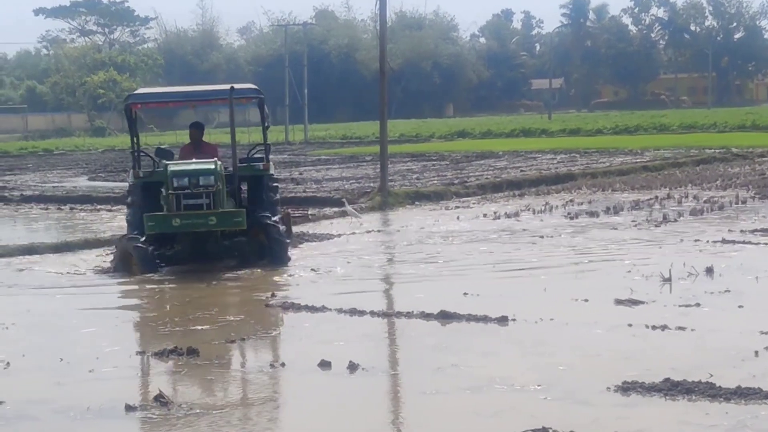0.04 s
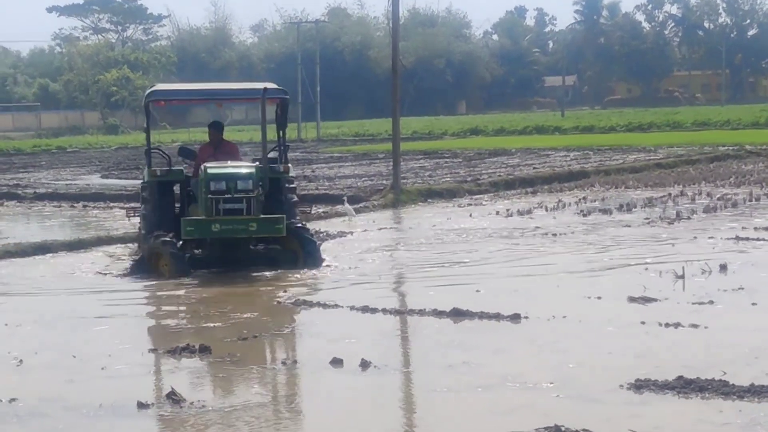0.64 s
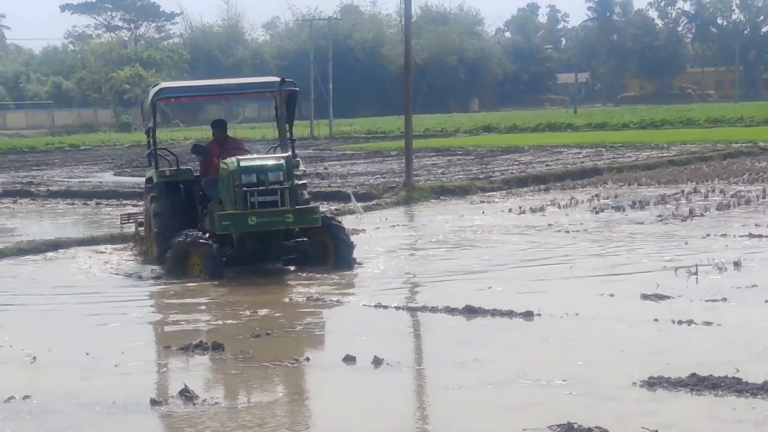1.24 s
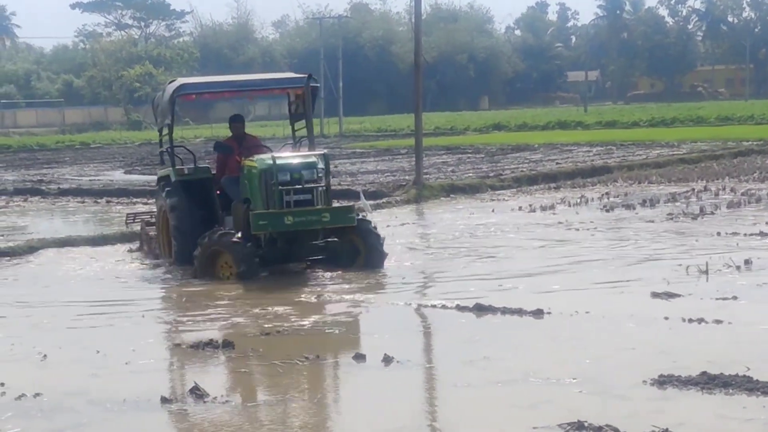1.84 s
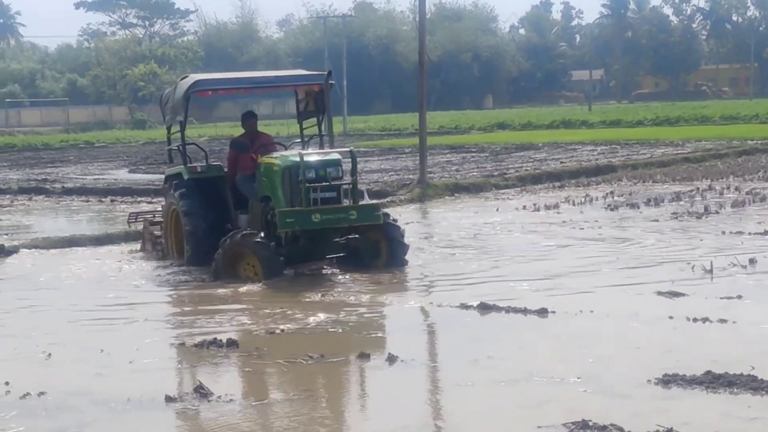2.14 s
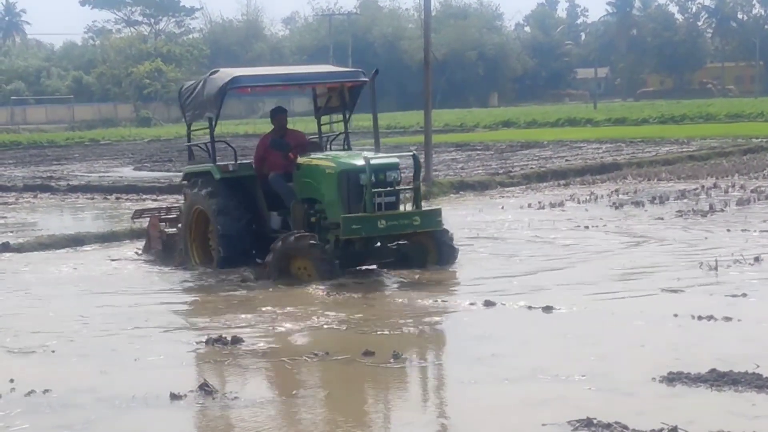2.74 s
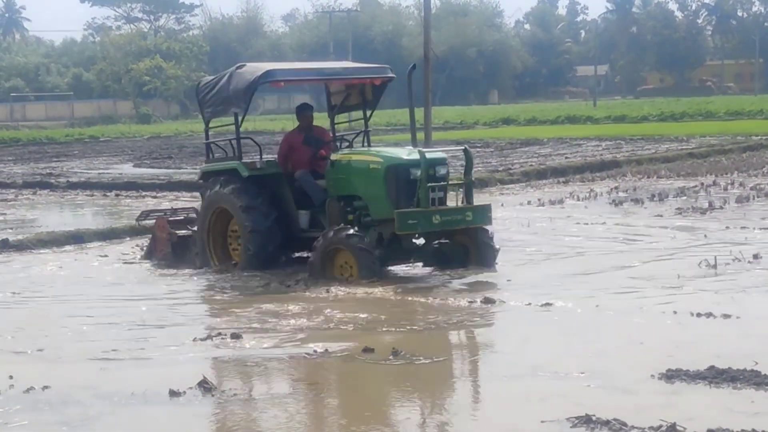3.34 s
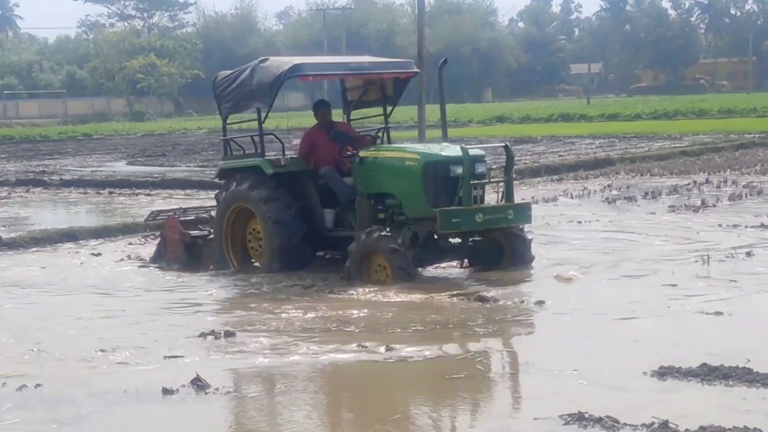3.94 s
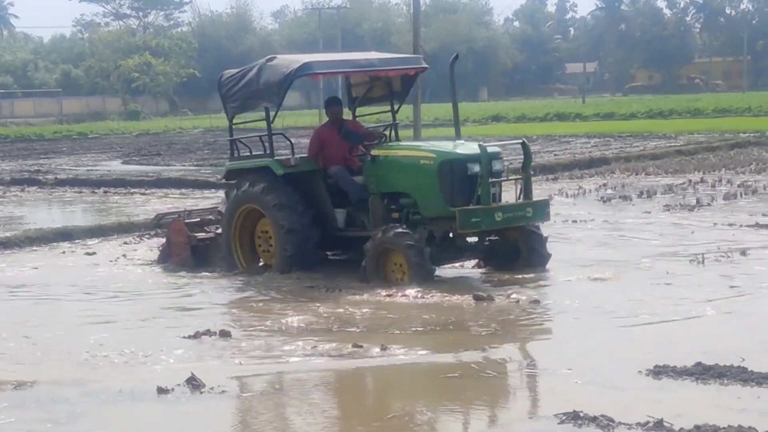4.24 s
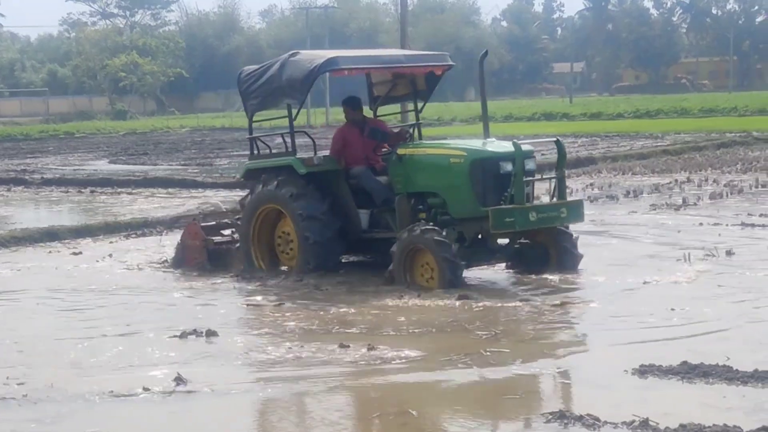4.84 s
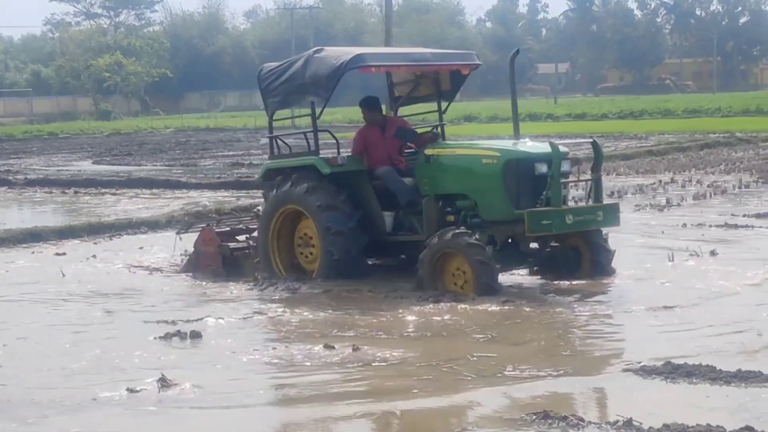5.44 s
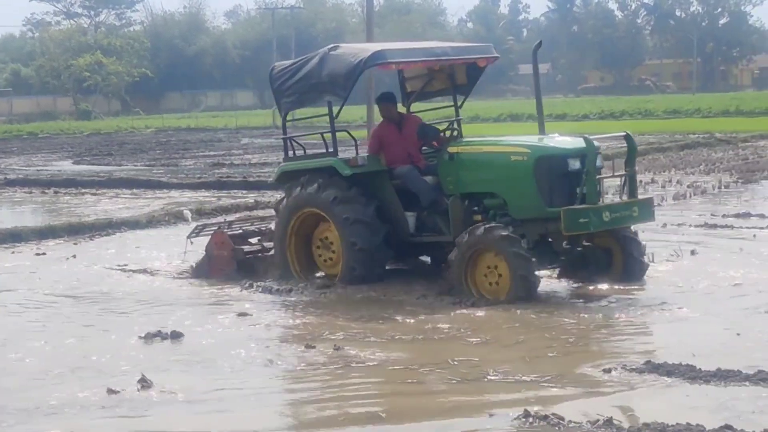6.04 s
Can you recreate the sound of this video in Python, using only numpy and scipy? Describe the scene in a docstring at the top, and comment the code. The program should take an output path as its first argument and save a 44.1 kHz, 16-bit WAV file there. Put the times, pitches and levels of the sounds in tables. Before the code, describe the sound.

Outdoors in a wet field, a tractor's diesel engine labours with a deep, rapid throb, then recovers after about two seconds and clatters on evenly, swelling and dipping as it turns. A thin whine and some exhaust hiss ride on top. Gusts rumble and crackle against the microphone, mainly on the right side, and one brief falling bird whistle sounds a little past halfway.

```python
"""Tractor tilling a flooded field

A three-cylinder diesel drags a rotary tiller through the mud and turns past a stereo microphone.
It lugs at first, then recovers: each firing booms in the exhaust and rattles the block; a gear whines.
A breeze buffets the microphone, mostly its right port, and a bird whistles once at the field's edge."""
import sys
import numpy as np
from scipy import signal
from scipy.fft import rfft, irfft
from scipy.io import wavfile
from scipy.ndimage import uniform_filter1d, minimum_filter1d, map_coordinates

SR = 44100
rng = np.random.default_rng(int(sys.argv[2]) if len(sys.argv) > 2 else 0)


def generate_wav(sig):
    """Save sig (samples, or channels by samples) to the path in sys.argv[1] as 16-bit PCM at SR."""
    pcm = np.round(np.clip(np.atleast_2d(sig).T, -1, 1) * 32767).astype(np.int16)
    wavfile.write(sys.argv[1], SR, pcm)


N = 272538
T = np.arange(N) / SR
FREQS = np.arange(N // 2 + 1) * SR / N

# how hard each of the three cylinders fires: relative_db
CYLINDER_DB = [2.4, 1.5, 0.29]


def undb(db):
    """Decibels to gain."""
    return 10 ** (np.asarray(db) / 20)


def unit(x):
    """Scale to rms 1."""
    return x / np.sqrt(np.mean(x ** 2))


def steady(x, window=SR // 4):
    """Hold the rms near 1 over a sliding window of samples."""
    return x / np.sqrt(uniform_filter1d(x ** 2, window))


def curves(table):
    """The columns of a table of (time_s, ...) rows, one value a sample."""
    times, *columns = np.transpose(table)
    return [np.interp(T, times, column) for column in columns]


def swell(middle_s, length_s):
    """A smooth rise to 1 and fall around a moment."""
    return np.exp(-(2 * (T - middle_s) / length_s) ** 2)


def noise():
    """White noise."""
    return rng.standard_normal(N)


def walk(rate_hz):
    """Random levels, each held 1 / rate_hz seconds, smoothed twice; rms 1."""
    hold = int(SR / rate_hz)
    steps = np.repeat(rng.standard_normal(N // hold + 1), hold)
    return unit(uniform_filter1d(uniform_filter1d(steps, hold), hold)[:N])


def cut(x, order, hz, kind="low"):
    """Butterworth low-pass or high-pass."""
    return signal.sosfilt(signal.butter(order, hz, kind, fs=SR, output="sos"), x)


def colour(x, points, column=1):
    """Filter by a spectrum of (frequency_hz, gain_db) points."""
    points = np.array(points, float)
    gain_db = np.interp(np.log(FREQS + 1), np.log(points[:, 0]), points[:, column])
    return irfft(rfft(x) * undb(gain_db), N)


def strike(x, points, size=2048):
    """Causal filter by (frequency_hz, gain_db) points: sharp start, short tail."""
    hz, db = np.transpose(points)
    bins_hz = np.arange(size // 2 + 1) * SR / size
    log_gain = np.log(undb(np.interp(np.log(bins_hz + 1), np.log(hz), db)))
    cepstrum = irfft(log_gain)[:size // 2]
    cepstrum[1:] *= 2
    return signal.fftconvolve(x, irfft(np.exp(rfft(cepstrum, size))))[:N]


def ring(x, hz, width_hz):
    """One resonance, gain 1 at its centre."""
    return signal.lfilter(*signal.iirpeak(hz, hz / width_hz, fs=SR), x)


def mode(x, hz, width_hz, widen=1):
    """Two resonances in series at one pitch, the second widened by a factor; rms 1."""
    return unit(ring(ring(x, hz, width_hz), hz, widen * width_hz))


def pan(x, right_db=0):
    """Feed both microphone ports, the right one changed by right_db."""
    left, right = np.broadcast_to(x, (2, N))
    return np.array([left, right * undb(right_db)])


def puffs(cycle, start, rise, fall, scatter_db):
    """An envelope that jumps and dies once a cycle; times are shares of the cycle."""
    turn, age = np.divmod(cycle - start + 1, 1)
    size = undb(np.resize(CYLINDER_DB, N // 100) + scatter_db * rng.standard_normal(N // 100))
    attack = 1 - np.exp(-(age / rise) ** 2)
    return unit(size[turn.astype(int)] * attack * np.exp(-age / fall))


def pulses(cycle, start, scatter_db):
    """One click a firing, each of its own strength, none far above the rest."""
    strength = undb(scatter_db * np.clip(noise(), -2.5, 1.2))
    firing = np.floor(cycle - start)
    return np.diff(firing, prepend=firing[0]) * strength


def rattle(cycle, per_firing, per_round):
    """Fresh noise plus a share that repeats every firing and one that repeats every round of cylinders."""
    out = noise()
    for share, firings in [(per_firing, 1), (per_round, len(CYLINDER_DB))]:
        grain = noise()[:round(firings * N / cycle[-1])]
        position = cycle / firings % 1 * len(grain)
        out = out + share * map_coordinates(grain, [position], mode="grid-wrap")
    return unit(out)


def bird(start_s=3.51, length_s=.095, from_hz=5250, to_hz=4130, level_db=-39):
    """One thin falling whistle from the field's edge."""
    progress = np.clip((T - start_s) / length_s, 0, 1)
    hz = (from_hz + (to_hz - from_hz) * progress) * (1 + .004 * walk(200))
    whistle = np.sin(2 * np.pi * np.cumsum(hz) / SR)
    return pan(whistle * np.sin(np.pi * progress) * undb(level_db))


def wind_pressure(port, breeze_db=(-26, -23), attack_s=.081, release_s=.02):
    """A steady breeze on one port, with gusts that rise, hold and die away."""
    # gusts over the microphone: start_s, length_s, level_db, port (0 left, 1 right)
    gusts = [(-.05, 0.43, -19, 1), (0.691, 0.4, -25, 0), (0.655, 0.1, -16.5, 1), (1.143, 0.72, -18, 1),
             (1.483, 0.21, -24.5, 0), (1.823, 1, -21.5, 1), (1.9, 0.39, -28.5, 0), (2.502, 0.3, -25, 0),
             (2.304, 0.12, -14.5, 0), (2.736, 0.36, -25.5, 0), (2.776, 0.31, -17, 1),
             (3.672, 0.074, -19, 1), (4.104, 0.68, -19.5, 1), (4.327, 0.12, -19, 0), (4.85, 0.2, -23, 0),
             (5.036, 0.43, -15.5, 1), (5.456, 0.56, -21, 0), (5.694, 0.62, -19.5, 1)]
    power = undb(breeze_db[port]) ** 2
    for start, length, db, side in gusts:
        if round(side) == port:
            shape = np.minimum((T - start) / attack_s, (start + length - T) / release_s)
            power = power + (undb(db) * np.clip(shape + .5, 0, 1)) ** 2
    return np.sqrt(power)


def small_eddies(strength, count=150, scatter_db=4.5, top_db=7):
    """Small eddies burst at random, as hard as the wind blows: rows of (time_s, gain)."""
    times = (np.arange(count) + rng.random(count)) * T[-1] / count
    size_db = .5 + np.minimum(scatter_db * rng.standard_normal(count), top_db)
    return list(zip(times, np.interp(times, T, strength) * undb(size_db)))


def eddy_pops(eddies, gain_db=38, spread_s=.004, follow_db=-6, followers=5):
    """Each bursting eddy is one sharp pressure pop with a few weaker ones after it."""
    out = np.zeros(N)
    for (s, gain), (delay, size) in zip(eddies, rng.standard_normal((len(eddies), 2, followers))):
        times = np.append(s, s + spread_s * np.abs(delay + .5)) - .0008
        at = (times * SR).astype(int)
        sizes = np.append(-1.2, undb(follow_db) * np.tanh(2 * size))
        inside = (at >= 0) & (at < N)
        np.add.at(out, at[inside], gain * sizes[inside])
    return out * undb(gain_db)


def tearing(buffets, gain_db=7, rise_s=.0044, fall_s=.014):
    """After each buffet the torn air rushes on and dies away, so close buffets roll together."""
    starts = np.zeros(N)
    for s, db in buffets:
        starts[min(int(s * SR), N - 1)] += undb(db)
    age = T[:SR // 8]
    rush = (1 - np.exp(-age / rise_s)) * np.exp(-age / fall_s)
    return noise() * undb(gain_db) * signal.fftconvolve(starts, rush)[:N]


def wind(rumble_gain_db=6.5, flutter_gain_db=7):
    """Wind right on the microphone: each port rumbles, and the strongest eddies tear into short rasps."""
    # rumble on a port: frequency_hz, gain_db
    rumble_spectrum = [(4, -13), (14, 6), (28, -3.5), (55, -3.5), (100, -14.5), (200, -20), (400, -34),
                       (1000, -64.5), (3000, -100.5)]
    # colour of a bursting eddy: frequency_hz, gain_db
    burst_spectrum = [(30, 8), (120, 9.5), (280, 1.5), (500, -1.5), (750, -4), (1000, -12.5), (1400, -30.5),
                      (2500, -35), (5000, -37.5), (8000, -78.5)]
    # the hardest eddies, all on the windward right port: time_s, relative_db
    right_buffets = [(.05, -8), (0.433, -15.5), (.441, -9), (.738, -7), (1.185, -12), (1.2, -6),
                     (1.218, -21), (1.293, -26), (1.342, -15.5), (1.369, -14.5), (1.405, -10.5),
                     (1.445, -15), (1.611, -13.5), (1.665, -9), (1.746, -24), (1.878, -11), (1.925, -5.5),
                     (1.991, -22), (2.173, -19.5), (2.237, -11), (2.276, -4.5), (2.336, -10), (2.369, -22),
                     (2.394, -17.5), (2.52, -14), (2.543, -24), (2.576, -18), (2.843, -25), (2.863, -12),
                     (2.877, -13), (2.921, -19.5), (2.944, -7.5), (2.953, -20.5), (2.99, -13), (3.01, -14),
                     (3.077, -23), (3.115, -17), (3.148, -14.5), (3.18, -11.5), (3.32, -16), (3.75, -7.5),
                     (4.169, 0), (4.197, -7), (4.29, -14), (4.322, -10), (4.406, -17), (4.594, -13.5),
                     (4.626, -11.5), (4.695, -21), (4.747, -21.5), (5.05, -4), (5.077, -21), (5.096, -10),
                     (5.19, -11), (5.384, -4), (5.501, -4), (5.535, -13.5), (5.838, -4.5), (5.909, -20),
                     (5.95, -15.5), (6.012, -8), (6.16, -8.5)]
    out = []
    for port, buffets in enumerate([[], right_buffets]):
        pressure = wind_pressure(port)
        rumble = steady(colour(noise(), rumble_spectrum), SR // 10) * pressure * undb(rumble_gain_db)
        rasp = pressure ** 1.44  # grows faster than the pressure
        flutter = noise() * rasp * undb(flutter_gain_db) * np.minimum(undb(8.1 * walk(110)), 6)
        pops = eddy_pops(small_eddies(rasp) + [(s, undb(db)) for s, db in buffets])
        out.append(rumble + strike(pops + flutter + tearing(buffets), burst_spectrum))
    return np.array(out)


def gust_cracks(fall_s=.0011, rebound_s=.0026, rebound_db=-4, top_hz=6000):
    """A gust slaps the ports: a ring of a cycle or two, and a rebound just after it."""
    # slaps on the microphone: time_s, level_db, pitch_hz, left_minus_right_db
    slaps = [(.052, -11, 950, -12), (.431, -5, 950, -8), (.441, -5, 1100, -8), (1.292, -9, 1000, -10),
             (2.237, -15, 1000, -10), (2.278, -12, 1100, -10), (2.336, -2, 900, -3), (2.368, -17, 1400, 0),
             (2.519, -9, 850, -10), (2.575, -10, 1000, -10), (2.943, -6, 850, -10), (2.99, -13, 1100, -10),
             (3.114, -11, 1000, -10), (3.75, -11, 750, -10), (4.196, -6, 950, -8), (5.05, -14, 1000, -10),
             (5.096, -11, 1100, -10), (5.383, -8, 900, -10), (5.502, -6, 850, -10), (5.838, -8, 900, -10)]
    out, age = np.zeros((2, N)), T[:SR // 50]
    for s, db, hz, left_db in slaps:
        slap = np.sin(2 * np.pi * hz * age) * np.exp(-age / fall_s) * undb([[db + left_db], [db]])
        gap_s = rebound_s * (1 + .18 * rng.standard_normal())
        for delay, gain in [(0, -1), (gap_s, undb(rebound_db))]:
            at = int((s + delay) * SR)
            out[:, at:at + len(age)] += gain * slap
    return cut(out, 4, top_hz)


def gear(cycle, waves_per_firing=34.74, floor_db=-51):
    """A thin wavering whine locked to the crankshaft; it swells with each bite of the tiller."""
    # the tiller's bites: middle_s, length_s, level_db
    bites = [(1.1, 0.23, -45), (1.747, 0.21, -55), (4.15, 0.34, -55), (4.917, 0.31, -45.5),
             (5.9, 0.18, -50)]
    whine = unit(np.sin(2 * np.pi * waves_per_firing * cycle + .4 * walk(21) + .35 * walk(120)))
    level = undb(floor_db) + sum(undb(db) * swell(s, length) for s, length, db in bites)
    return pan(whine * level * undb(1.8 * walk(12)))


def stack_hiss(cycle, load):
    """As each exhaust valve opens the thin stack pings, and a hiss of gas trails off through the cycle."""
    # rings of the stack: pitch_hz, width_hz, relative_db
    stack_modes = [(4704, 190, 0.5), (4935, 55, -5)]
    # escaping gas: frequency_hz, gain_db
    hiss_spectrum = [(2500, -26), (3800, -0.5), (4750, 6), (5300, 2), (6100, -11), (7000, -17), (9000, -28),
                     (13000, -53.5)]
    # the stack swings right, left and back as the tractor turns: time_s, right_minus_left_db
    bearing = [(0, 6), (1.1, -0.5), (1.7, -5), (6.18, 3.5)]
    opening = cycle + .009 * walk(60)
    ping = sum(undb(db) * mode(pulses(opening, start=.12, scatter_db=5.5), hz, width, widen=3)
               for hz, width, db in stack_modes)
    trail = puffs(cycle, start=.1, rise=.06, fall=.65, scatter_db=1.5)
    gas = np.array([unit(colour(noise() * trail, hiss_spectrum)) for port in range(2)])
    return pan(ping * (.084 + .38 * load) + gas * undb(-9), curves(bearing)[0])


def diesel_knock(cycle, load, clack_db=-10):
    """Each ignition pings a few panel modes; when the engine lugs it also lands a short hard clack."""
    # panel rings: pitch_hz, width_hz, free_running_db, full_load_added_db, strike_share_of_cycle
    panel_modes = [(2285, 62, -10.5, -12.5, .22), (2416, 92, -15.5, 15.5, .25), (3104, 47, -24, 12.5, 0.4),
                   (3374, 110, -20.5, -4, .29)]
    # how strongly the panels ring toward the microphone: time_s, relative_db
    panel_level = [(0, 1.5), (.85, 3.5), (1.4, 0), (3.2, -1), (3.5, .5), (3.72, 4.5), (4.05, 4.5), (4.4, 2),
                   (5, 4), (5.35, 3.5), (6.18, -1)]
    jittered = cycle + .012 * walk(60)
    pings = 0
    for hz, width, db, load_db, start in panel_modes:
        hits = pulses(jittered, start, scatter_db=5)
        pings += undb(db + load_db * load) * mode(hits, hz, width, widen=1.5)
    blow = noise() * puffs(cycle, start=.24, rise=.04, fall=.08, scatter_db=2)
    clack = mode(blow, hz=2400, width_hz=300, widen=2)
    return pan(pings * .52 * undb(curves(panel_level)[0]) + undb(clack_db) * load * clack)


def block(cycle, load):
    """Combustion and valve taps rattle the block and panels over a steady wash of fan and churned mud."""
    # ring of block and panels at the microphone: frequency_hz, left_db, right_db
    body_spectrum = [(150, -22, 9.5), (386, -8.5, -0.5), (514, -22, -33.5), (722, 4.5, 0),
                     (1160, -11, -12.5), (1570, -2, -7), (1827, -9.5, -16.5), (2527, -6.5, -4.5),
                     (2760, -13.5, -10.5), (3460, -21, -6.5), (3760, -25, -13.5), (3990, -9.5, -13.5),
                     (5550, -13.5, -19.5), (6490, -25.5, -36), (6870, -39.5, -34), (8000, -38, -57),
                     (11200, -62.5, -55.5)]
    # phase between the ports: frequency_hz, left_lead_rad
    port_phase = [(0, 0), (950, 0.3), (1210, 1.2), (1720, 0.7), (2070, 5.6), (2500, 6.5), (3270, 11.7),
                  (3700, 9.6), (3960, 10.0), (4390, 8.0), (4820, 7.8), (5510, 10.7), (6120, 12.9),
                  (6630, 12.7)]
    knock = (.48 + .45 * load) * puffs(cycle, start=.15, rise=.09, fall=.28, scatter_db=1.8)
    taps = .3 * (1 - load) * puffs(2 * cycle, start=.71, rise=.032, fall=.98, scatter_db=-3)
    wash = .62 - .2 * load
    drive = unit(np.sqrt(knock ** 2 + taps ** 2 + wash ** 2))
    left = rattle(cycle, per_firing=.36, per_round=.8) * drive
    lag = np.interp(FREQS, *np.transpose(port_phase))
    right = irfft(rfft(left) * np.exp(-1j * lag), N)
    clatter = np.array([colour(side + .81 * noise() * drive, body_spectrum, column=1 + port)
                        for port, side in enumerate([left, right])])
    clatter = cut(clatter, 3, hz=370, kind="high")
    return clatter / np.std(clatter[0]) * undb(3 + 1.38 * walk(14))


def growl(cycle, load):
    """Gas growls at the outlet, more as the load comes off."""
    # resonances of the gas noise: pitch_hz, width_hz, relative_db
    outlet_modes = [(219, 28, -17.5), (352, 45, -18), (387.3, 33, -19.5), (717.5, 64, -26), (820, 150, -19)]
    # how much reaches the microphone as the tractor turns: time_s, relative_db
    reach = [(0, -2), (1.6, -3.5), (2.4, -7), (3.2, 0.5), (3.6, -1), (4.1, 1), (4.9, 1), (5.4, -1),
             (6.18, 4.5)]
    flow = rattle(cycle, per_firing=1.8, per_round=2)
    flow *= puffs(cycle, start=.17, rise=.062, fall=.9, scatter_db=3)
    rings = sum(undb(db) * mode(flow, hz, width) for hz, width, db in outlet_modes)
    return (1 - load) * undb(curves(reach)[0]) * rings


def bark(cycle, load, low_hz=660, top_hz=2000):
    """Under load each firing barks from the exhaust: a crack and a puff of gas."""
    # single firings that bark harder: time_s, added_db
    hard_firings = [(.168, 4), (.264, 9), (.335, 3.5), (.481, 7), (.505, 3), (.647, 5), (.762, 3)]
    slaps = pulses(cycle, start=.21, scatter_db=1.4)
    crack = unit(ring(ring(slaps, 790, 190), 933, 150))
    gas = unit(ring(ring(noise(), 905, 270), 780, 200))
    gas *= puffs(cycle, start=.059, rise=.12, fall=.11, scatter_db=0)
    harder_db = sum(db * swell(s, .02) for s, db in hard_firings)
    barks = load * undb(harder_db) * (undb(-13) * crack + undb(-14) * gas)
    return cut(cut(barks, 4, low_hz, "high"), 2, top_hz)


def boom(cycle, load, muffler_hz=172, slug_share=.069, slug_at=.22):
    """Each firing rings the muffled pipe; mostly under load, a gas slug shoves air out and sucks it back."""
    # exhaust resonances: pitch_hz, width_hz, free_running_db, full_load_added_db
    pipe_modes = [(33, 11.4, -9.5, -10.5), (101.3, 45, -15.5, -2.5), (147.3, 15, -18, 16.5),
                  (174.8, 16, -33.5, 23)]
    kicks = pulses(cycle - .073 * load, start=.09, scatter_db=2)
    pipe = sum(undb(db + load_db * load) * ring(kicks, hz, width) for hz, width, db, load_db in pipe_modes)
    pipe = steady(signal.sosfiltfilt(signal.butter(4, muffler_hz, fs=SR, output="sos"), pipe))
    turn, age = np.divmod(cycle - slug_at + .5, 1)
    size = undb(.81 * rng.standard_normal(N // 100))[turn.astype(int)]
    outflow = size * np.exp(-.5 * ((age - .5) / slug_share) ** 2)
    slug = unit(np.gradient(outflow))
    return steady((1 - 1.04 * load) * pipe + (.15 + .57 * load) * slug)


def scene():
    """Engine speed and load drive the tractor; wind and bird come on top."""
    # engine speed: time_s, firing_rate_hz
    speed = [(0.0, 44.21), (0.25, 41.59), (0.45, 41.46), (0.7, 43.26), (0.95, 45.14), (1.25, 45.72),
             (1.6, 47.25), (2.1, 46.79), (2.7, 47.88), (3.1, 47.72), (3.5, 47.07), (4.0, 47.31),
             (4.6, 47.62), (5.1, 47.31), (5.55, 47.36), (6.18, 48.06)]
    # how hard the engine lugs: time_s, load (0-1)
    lugging = [(0, 0.5), (.5, 0.61), (1.1, 0.45), (1.5, 0.29), (2, 0), (6.18, 0)]
    # the turning tractor from the microphone: time_s, exhaust_db, clatter_db, hiss_over_clatter_db
    engine_levels = [(0, -16.5, -36.5, -6.5), (.45, -16.5, -36.5, -10), (.66, -14.5, -30.5, -0.5),
                     (1.15, -14, -31.5, 0), (1.48, -22, -39.5, 7.5), (1.9, -23, -38.5, -11),
                     (2.08, -26, -41, -7), (2.34, -19.5, -36.5, -7), (2.55, -22, -38, -12),
                     (3.17, -23.5, -38, -15), (3.48, -17, -31.5, -2), (3.68, -15, -29, -10),
                     (3.83, -19, -33.5, -15), (4.08, -14, -29, 0.5), (4.28, -22, -34.5, -10),
                     (4.65, -17.5, -32.5, -14), (4.97, -16, -29, -8), (5.18, -20, -30.5, -10),
                     (5.38, -21, -30, -7), (5.58, -21.5, -36, -7), (5.76, -20, -31, -5),
                     (5.95, -23, -36.5, -9), (6.18, -26.5, -33.5, -3)]
    cycle = np.cumsum(curves(speed)[0]) / SR  # counts firings
    load = curves(lugging)[0]
    exhaust_db, clatter_db, hiss_db = curves(engine_levels)
    clatter = block(cycle, load) + diesel_knock(cycle, load) + undb(hiss_db) * stack_hiss(cycle, load)
    exhaust = pan(growl(cycle, load) + bark(cycle, load), right_db=-.53) + pan(boom(cycle, load))
    tractor = undb(exhaust_db) * exhaust + undb(clatter_db) * clatter + gear(cycle)
    return tractor + wind() + gust_cracks() + bird()


def record(dry, ceiling=.9, fade_s=.003, top_hz=12500):
    """The recorder blocks the slowest pressure swings, limits the highest peaks and cuts the top."""
    x = cut(dry, 1, hz=6, kind="high")
    gain = minimum_filter1d(ceiling / np.maximum(np.abs(x), ceiling), 80)
    x = x * uniform_filter1d(uniform_filter1d(gain, 40), 40)
    edge_s = np.minimum(T, T[-1] - T)
    fade = np.sin(np.pi / 2 * np.minimum(edge_s / fade_s, 1)) ** 2
    return signal.sosfilt(signal.ellip(8, .2, 70, top_hz, fs=SR, output="sos"), x * fade)


dry = scene()
out = record(dry)
generate_wav(out)
```